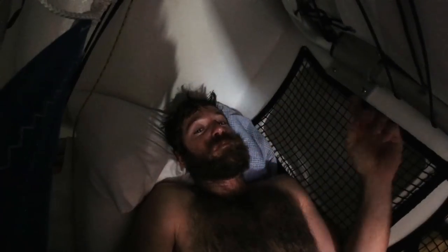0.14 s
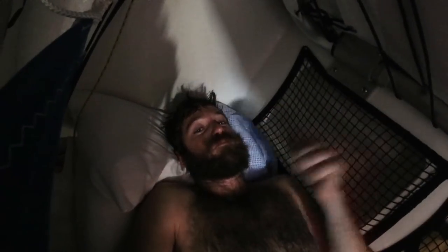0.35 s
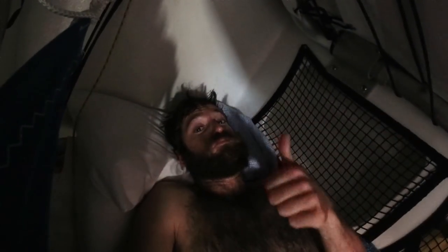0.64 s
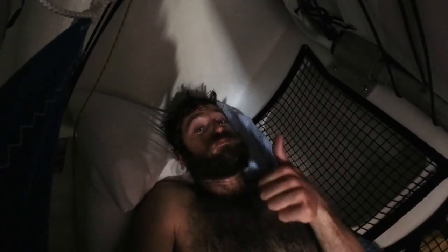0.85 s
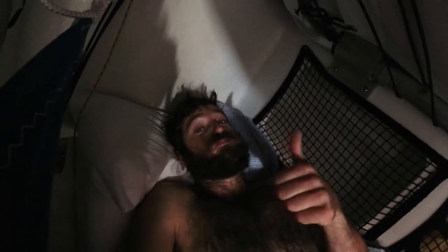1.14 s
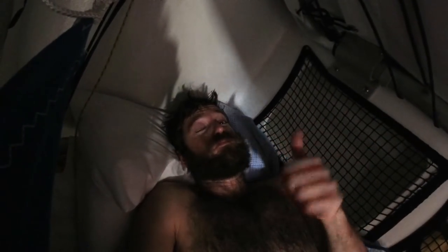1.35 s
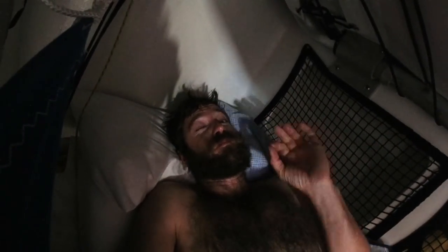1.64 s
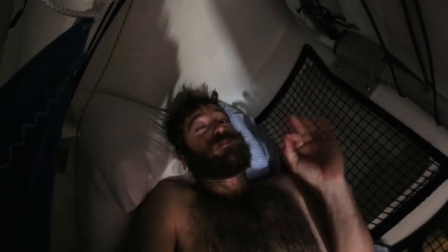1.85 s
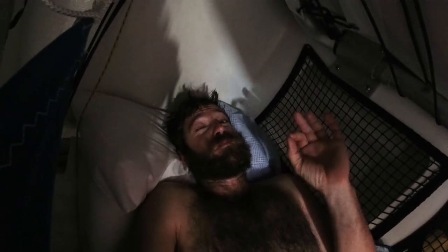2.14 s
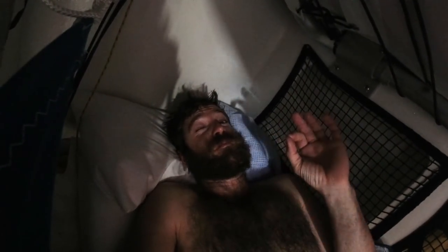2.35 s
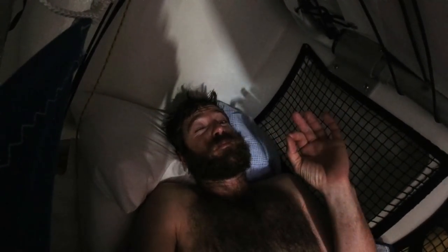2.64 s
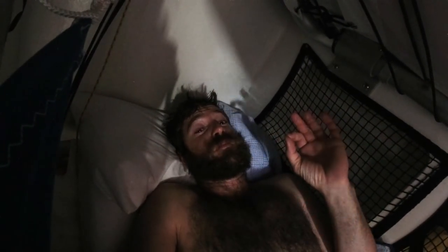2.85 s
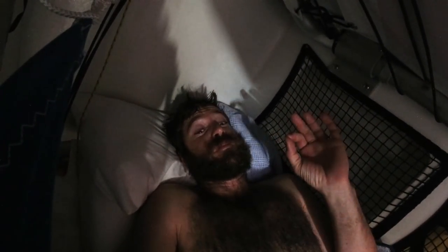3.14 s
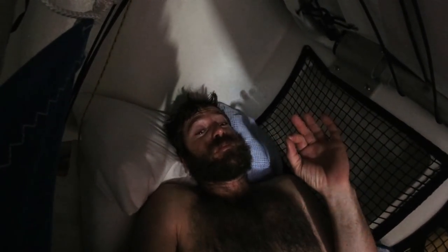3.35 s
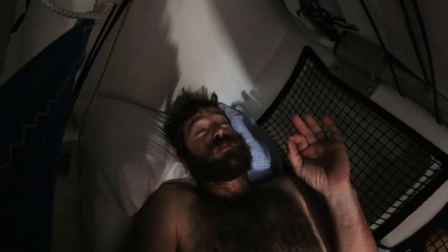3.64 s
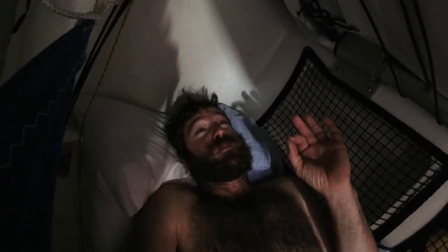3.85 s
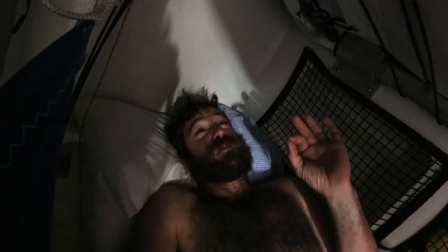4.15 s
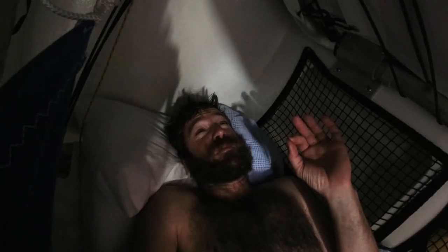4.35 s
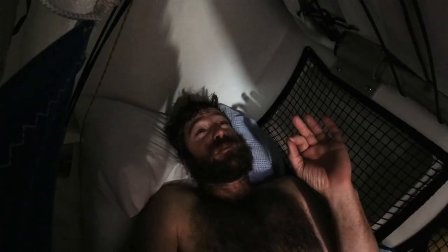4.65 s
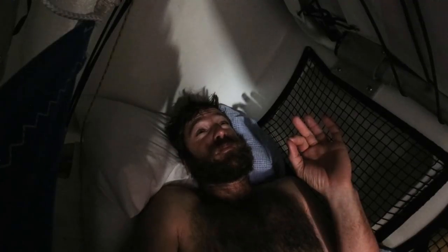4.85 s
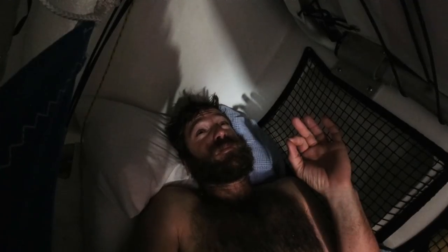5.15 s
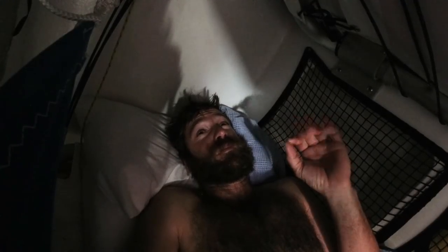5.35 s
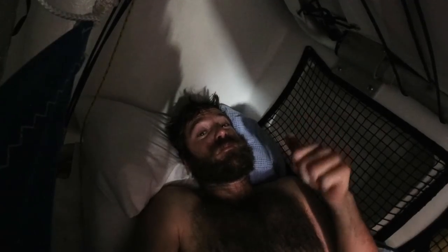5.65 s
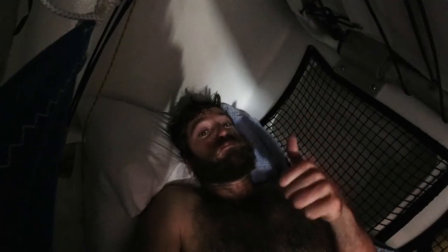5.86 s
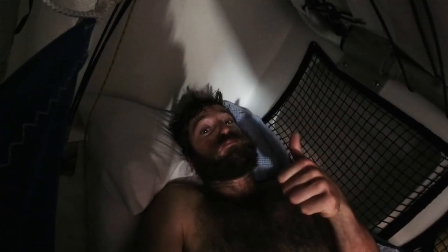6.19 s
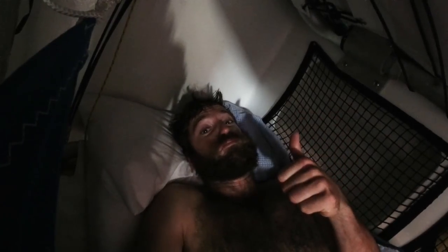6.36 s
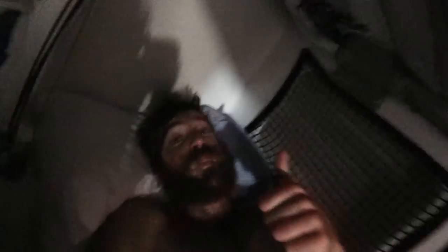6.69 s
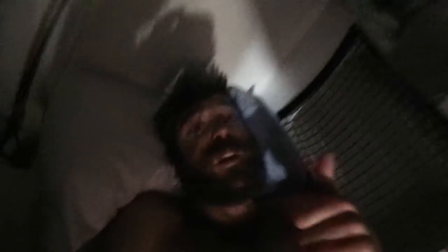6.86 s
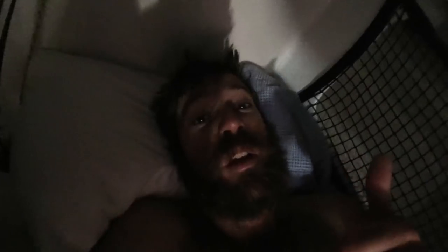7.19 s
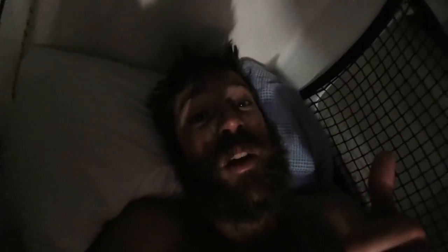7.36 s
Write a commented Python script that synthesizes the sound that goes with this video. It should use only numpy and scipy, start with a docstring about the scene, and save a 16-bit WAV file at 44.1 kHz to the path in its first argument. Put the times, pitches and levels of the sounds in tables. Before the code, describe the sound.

Loud, fast clatter of a straining rope rings through a boat cabin, quickens, slows and stops, followed by a few separate knocks.

```python
"""In a bunk below deck, a loaded rope is heard easing round a deck fitting. It moves by stick-slip
friction: each slip strikes the hull like a hammer and sets its modes ringing. The slips speed up, slow
down and stop; their reverberation gives way to quiet water. Single knocks come from elsewhere, one early
and three after the rope rests, when two low hums and three faint ticks also sound. Bedding rustles, the
loudest blows overload the small microphone, and a low rumble grows at the end as it is handled."""
import sys
import numpy as np
from scipy import signal
from scipy.fft import rfft, irfft, next_fast_len
from scipy.io import wavfile
from scipy.ndimage import map_coordinates

SR = 44100
rng = np.random.default_rng(int(sys.argv[2]) if len(sys.argv) > 2 else 0)


def wav_record(signal):
    """Record a signal, one row per channel, as 16-bit PCM in the file named by sys.argv[1]."""
    frames = np.transpose(np.atleast_2d(signal))
    bounded = np.clip(frames, -1, 1)
    # unit amplitude maps onto the largest positive 16-bit level
    quanta = np.round(bounded * 32767).astype(np.int16)
    wavfile.write(sys.argv[1], SR, quanta)


N = 331747
RING_SAMPLES = SR // 2
LEAD_S = 0.003  # a blow starts this long before it is loud

# background noise, hull reverberation while the rope slips and then quiet water:
# (time [s], low rumble [dB], murmur [dB], wash [dB])
BACKGROUND_LEVELS = [(0, -45, -51, -40.5), (2.8, -48, -58, -43.5), (3.8, -56, -55.5, -45),
                     (4.9, -49, -54, -56), (5.152, -56, -54.5, -60.5), (6.102, -56.5, -53.5, -59),
                     (6.4, -58, -62, -57), (6.9, -53, -62.5, -55.5), (7.3, -50, -56.5, -55.5)]
# movements of the bedding: (middle [s], half length [s], level [dB])
BEDDING_MOVES = [(1.14, 0.16, -54.5), (6.942, 0.34, -69.5)]
# spectra of the three background noises and the bedding: (frequency [Hz], relative density [dB])
RUMBLE_SPECTRUM = [(12, -26.5), (22, -15.5), (40, -1.5), (80, -8.5), (150, -19), (260, -32), (500, -80)]
MURMUR_SPECTRUM = [(120, -51.5), (187, -7), (260, -14.5), (350, -4), (400, -7), (480, -14.5), (800, -49.5)]
WASH_SPECTRUM = [(150, -29), (400, -11.5), (700, -12), (1400, -16.5), (2500, -22), (3500, -24.5),
                 (5000, -33.5), (8000, -56.5)]
BEDDING_SPECTRUM = [(2500, -31), (4200, -3.5), (7000, -10.5), (9200, -0.5), (12000, -3.5), (15500, -16)]
# random level flutter of rumble, murmur, wash and bedding: (depth [dB], rate [1/s])
FLUTTERS = [(1.5, 6), (1.5, 20), (.6, 9), (2.2, 25)]
# likeness of left and right in the cabin: (frequency [Hz], coherence [0..1])
COHERENCE = [(60, 1), (110, 0.99), (190, 1), (330, 0.97), (570, 1), (1010, 0.91), (1770, 0.43),
             (3110, 0.18)]
# distinct modes of the hull: (frequency [Hz], level [dB], t60 [s], rise time [s])
HULL_MODES = [(64.2, -21.5, 0.15, 0.0054), (199, -32.5, 0.12, 0.0059), (217.7, -27, 0.36, 0.0023),
              (326.8, 1, 0.048, 0.0081), (428.4, -1.5, 0.12, 0.031), (500.7, -17, 0.14, 0.0096),
              (582.4, -15.5, 0.11, 0.0036), (694.7, -11, 0.061, 0.0022), (753, -15.5, 0.076, 0.0046),
              (901, -31, 0.15, 0.0009), (956.9, -19, 0.091, 0.0016), (1004.7, -23, 0.081, 0.0026),
              (1187, -20, 0.059, 0.0046), (1276, -12.5, 0.041, 0.0033), (1450, -30.5, 0.11, 0.011),
              (1450.6, -26.5, 0.056, 0.0025), (1568, -37, 0.13, 0.0022), (1798, -25, 0.088, 0.015),
              (1848, -29.5, 0.09, 0.0024), (2061, -21.5, 0.031, 0.0033), (2057, -39.5, 0.096, 0.00082),
              (2212, -41.5, 0.1, 0.00032), (2333, -19, 0.023, 0.0013), (2480, -31, 0.048, 0.0012),
              (2735, -35.5, 0.087, 0.0049), (2795, -37.5, 0.042, 0.0012), (3040, -39.5, 0.11, 0.0038),
              (3070, -31, 0.039, 0.0025)]
# modes too close to tell apart: (frequency [Hz], in-phase level [dB], antiphase level [dB], t60 [s])
DENSE_BANDS = [(30, 2.5, -30.5, 0.57), (77.5, -1.5, -27.5, 0.17), (120, -14.5, -37, 0.1),
               (194, -4, -33.5, 0.56), (260, -3.5, -21, 0.28), (400, 6.5, -3.5, 0.22),
               (744, -12, -20, 0.21), (1482, -9.5, -14.5, 0.13), (2830, -25.5, -21.5, 0.15),
               (4020, -30, -29, 0.12), (6264, -54, -48.5, 0.11), (9600, -54, -55.5, 0.2),
               (15000, -80, -83, 0.1)]
# moments at which the rope lets go: (time [s])
SLIP_TIMES = [.014, .088, .177, .266, 0.507, .585, 0.662, .737, .811, .883, .955, 1.023, 1.102, 1.2, 1.323,
              1.442, 1.546, 1.646, 1.733, 1.807, 1.879, 1.958, 2.023, 2.092, 2.158, 2.226, 2.293, 2.359,
              2.441, 2.518, 2.598, 2.681, 2.758, 2.833, 2.906, 2.965, 3.008, 3.06, 3.116, 3.167, 3.212,
              3.253, 3.304, 3.351, 3.398, 3.439, 3.48, 3.517, 3.56, 3.601, 3.646, 3.685, 3.721, 3.754,
              3.789, 3.825, 3.86, 3.896, 3.928, 3.959, 3.989, 4.022, 4.058, 4.097, 4.139, 4.179, 4.215,
              4.258, 4.314, 4.375, 4.437, 4.486, 4.548, 4.637, 4.751, 4.84, 4.952]
# load on the rope, as the strength of a slip: (time [s], level [dB])
ROPE_LOAD = [(0, -2), (1.5, -0.87), (2.9, -1.36), (3.4, -3.5), (3.9, -6), (4.4, -5.5), (4.95, -6)]
# single blows: (time [s], mode gain [dB], favoured frequency [Hz], half-width [octaves],
# dense ring gain [dB], boom gain [dB])
KNOCK_BLOWS = [(0.347, 23.5, 318, 0.39, 18, 18.5), (6.455, 9.5, 360, 0.97, 9.5, -6),
               (7.157, 1.5, 580, 2.3, 6, 3), (7.505, -1.5, 489, 1.4, -11, 4.5)]
# pulses of the low hum: (start [s], length [s], starting level [dB])
HUM_PULSES = [(6.51, .095, -33), (6.7, .075, -45)]
# small dry ticks: (time [s], gain [dB], relative ring gain [dB])
TICK_TOUCHES = [(6.527, -55, -18), (6.895, -58, -18), (6.95, -56, -4)]
# modes of the ticking part: (frequency [Hz], relative level [dB], t60 [s])
SMALL_PART_MODES = [(1700, 2, 0.0098), (3570, 19, 0.028), (5570, -2, 0.0071)]


def amp(db):
    """Amplitude ratio of a level in decibels."""
    return 10 ** (np.asarray(db) / 20)


def along(table, hz, col=1):
    """Interpolation of a table column on a logarithmic frequency axis."""
    columns = np.transpose(table)
    return np.interp(np.log(hz + 1), np.log(columns[0] + 1), columns[col])


def filtered(x, response):
    """Linear filtering: the spectrum of x is multiplied by a frequency response."""
    size = next_fast_len(x.shape[-1] + 8192)
    return irfft(rfft(x, size) * response(np.fft.rfftfreq(size, 1 / SR)), size)[..., :x.shape[-1]]


def add(out, start_s, sound):
    """Superposition of a sound on the stereo mix."""
    start = max(round(start_s * SR), 0)
    out[:, start:start + sound.shape[-1]] += sound[..., :N - start]


def cabin_noise(spectrum, flutter_db, flutter_rate):
    """Partial coherence: fluttering noise of rms 1, alike in both channels at low frequencies."""
    def response(hz):
        angle = np.arccos(np.clip(along(COHERENCE, hz), 0, 1)) / 2
        return amp(along(spectrum, hz)) * [np.cos(angle), np.sin(angle)]

    mid, side = filtered(rng.standard_normal((2, N)), response)
    knots = rng.standard_normal(int(N * flutter_rate / SR) + 4)
    flutter = map_coordinates(knots, [np.arange(N) * flutter_rate / SR])
    pair = np.array([mid + side, mid - side]) * amp(flutter_db * flutter)
    return pair / pair.std()


def background():
    """Background noise: lingering hull reverberation while the rope slips, then quiet water.
    A low rumble grows at the end as the microphone is handled."""
    t = np.arange(N) / SR
    times, *levels = np.transpose(BACKGROUND_LEVELS)
    spectra = RUMBLE_SPECTRUM, MURMUR_SPECTRUM, WASH_SPECTRUM
    return sum(amp(np.interp(t, times, db)) * cabin_noise(spectrum, *flutter)
               for db, spectrum, flutter in zip(levels, spectra, FLUTTERS[:3]))


def bedding(rest_db=-80):
    """Friction noise: cloth hisses faintly throughout and rustles when it moves."""
    t = np.arange(N) / SR
    rustles = sum(amp(db) * np.exp(-((t - middle) / half) ** 2) for middle, half, db in BEDDING_MOVES)
    return (amp(rest_db) + rustles) * cabin_noise(BEDDING_SPECTRUM, *FLUTTERS[3])


def hull_modes():
    """Damped free vibration, one row per mode: each builds up as the blow spreads, then decays."""
    hz, db, t60, rise_s = np.transpose(HULL_MODES)[..., None]
    t = np.arange(RING_SAMPLES) / SR
    return amp(db - 60 * t / t60) * (1 - np.exp(-t / rise_s)) * np.sin(2 * np.pi * hz * t)


def dense_ring(rise_s=0.0022):
    """Modal overlap: many small modes merge into stereo noise that decays band by band."""
    hz, t, spectra = signal.stft(rng.standard_normal((2, RING_SAMPLES)), SR, nperseg=512)
    colour = amp([along(DENSE_BANDS, hz, col=1), along(DENSE_BANDS, hz, col=2)])[..., None]
    decay = amp(-60 * t / along(DENSE_BANDS, hz, col=3)[:, None])
    mid, side = signal.istft(spectra * colour * decay, SR, nperseg=512)[1][:, :RING_SAMPLES]
    attack = 1 - np.exp(-np.arange(RING_SAMPLES) / SR / rise_s)
    return np.array([mid + side, mid - side]) * attack


def bright_crack(edge_hz=7000, t60=0.07):
    """Microphone overload: a short treble crackle on the loudest slips, modelled as a noise burst."""
    t = np.arange(SR // 20) / SR
    octave_band = lambda f: 1 / (1 + (edge_hz / (f + 1)) ** 4) / (1 + (f / (2 * edge_hz)) ** 4)
    hiss = filtered(rng.standard_normal((2, len(t))), octave_band)
    return hiss * amp(-60 * t / t60) * (1 - np.exp(-t / LEAD_S))


def rope_slips(hull_db=10, dense_db=8, fresh_db=-2, fresh_hz=700, scatter_db=1.58, detune=0.0036):
    """Stick-slip friction: the longer the rope has stuck, the harder it strikes the hull.
    The same spot is always struck, so the ring nearly repeats, most closely below fresh_hz."""
    out, modes, dense = np.zeros((2, N)), hull_modes(), dense_ring()
    fresh = np.array([dense_ring() for _ in range(9)])
    fresh = filtered(fresh, lambda f: f ** 2 / (f ** 2 + fresh_hz ** 2))
    octaves = np.log2(np.transpose(HULL_MODES)[0] / 1000)
    samples = np.arange(RING_SAMPLES)
    usual_wait_s, full_load_s, db_per_doubling = 0.061, 0.31, 0.5
    waits = np.minimum(np.diff(SLIP_TIMES, prepend=SLIP_TIMES[0] - usual_wait_s), full_load_s)
    load_db = np.interp(SLIP_TIMES, *np.transpose(ROPE_LOAD))
    levels = load_db + db_per_doubling * np.log2(waits / usual_wait_s)
    for k, (time, db) in enumerate(zip(SLIP_TIMES, levels)):
        tilt_draw, pitch_draw, fresh_draw = rng.standard_normal(3)
        tilt_db = (0.17 - 0.03 * tilt_draw) * octaves
        mode_gains = amp(hull_db + tilt_db + scatter_db * rng.standard_normal(len(octaves)))
        ring = np.interp(samples * (1 + detune * pitch_draw), samples, mode_gains @ modes)
        tail = amp(dense_db) * (dense + amp(fresh_db) * fresh[k % len(fresh)] * fresh_draw)
        add(out, time - LEAD_S, amp(db) * (ring + tail))
        crack_db = -33 + 2.5 * db + fresh_draw  # grows far faster than the ring does
        add(out, time - LEAD_S, amp(crack_db) * bright_crack())
    return out


def knocks(rise_s=0.004, damping_t60=0.82, boom_hz=172):
    """Selective excitation: blows at other spots favour other modes and leave a low boom.
    The blunt contact softens the attack and adds damping to the ring."""
    out, modes = np.zeros((2, N)), hull_modes()
    t = np.arange(RING_SAMPLES) / SR
    mode_hz = np.transpose(HULL_MODES)[0]
    attack, damping = 1 - np.exp(-t / rise_s), amp(-60 * t / damping_t60)
    for time, db, favoured_hz, octaves, dense_db, boom_db in KNOCK_BLOWS:
        favour = lambda f: 1 / (1 + (np.log2((f + 20) / favoured_hz) / octaves) ** 2)
        dense = filtered(dense_ring(), lambda f: np.sqrt(favour(f)))
        boom = filtered(dense_ring(), lambda f: 1 / (1 + (f / boom_hz) ** 4))
        ring = amp(db) * favour(mode_hz) @ modes + amp(dense_db) * dense
        add(out, time - LEAD_S, attack * (damping * ring + amp(boom_db) * boom))
    return out


def hum(hz=177.6, edge_s=0.03, sag_db_per_s=33):
    """Amplitude modulation of a low pure tone: each pulse swells in, sags and stops."""
    t = np.arange(N) / SR
    envelope = np.zeros(N)
    for start, length, db in HUM_PULSES:
        gate = (np.minimum(t - start, start + length - t) / edge_s + 0.5).clip(0, 1)
        envelope += gate * amp(db - sag_db_per_s * (t - start).clip(0))
    return envelope * np.sin(2 * np.pi * hz * t)


def ticks(crack_db=12, crack_t60=0.03, rise_s=0.0015):
    """Impact excitation: a small hard part touches lightly, with a soft crack and a little ring."""
    out, t = np.zeros((2, N)), np.arange(SR // 20) / SR
    attack = 1 - np.exp(-t / rise_s)
    ring = sum(amp(db - 60 * t / t60) * np.sin(2 * np.pi * hz * t) for hz, db, t60 in SMALL_PART_MODES)
    crack_band = lambda f: 1 / (1 + (f / 4500) ** 6) / (1 + (1500 / (f + 1)) ** 2)
    for time, db, ring_db in TICK_TOUCHES:
        crack = filtered(rng.standard_normal(len(t)), crack_band) * amp(crack_db - 60 * t / crack_t60)
        add(out, time, amp(db) * attack * (amp(ring_db) * ring + crack))
    return out


def scene():
    """Superposition at the bunk: the brief sounds add to the continuous noises."""
    return rope_slips() + knocks() + hum() + ticks() + background() + bedding()


def record(dry, hardness=16, low_hz=15, top_hz=15700):
    """Saturation and band limiting: the microphone overloads at full scale and passes a finite band."""
    saturated = dry / (1 + np.abs(dry) ** hardness) ** (1 / hardness)
    passband = lambda hz: (hz < top_hz) * hz ** 2 / (hz ** 2 + low_hz ** 2)
    return np.clip(filtered(saturated, passband), -1, 1)


dry = scene()
out = record(dry)
wav_record(out)
```